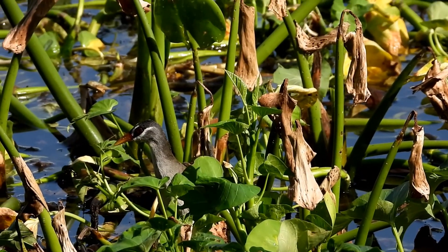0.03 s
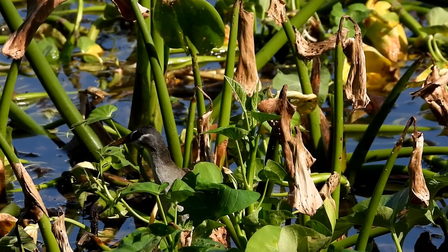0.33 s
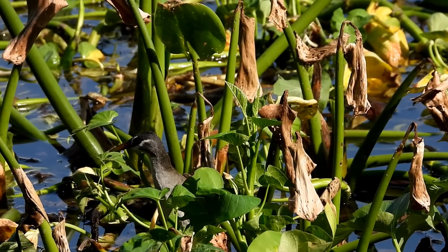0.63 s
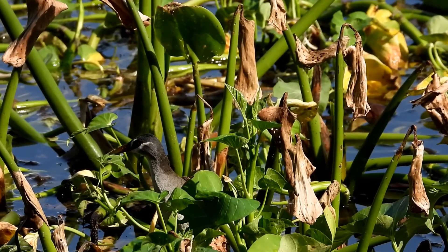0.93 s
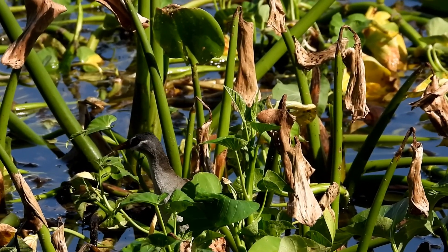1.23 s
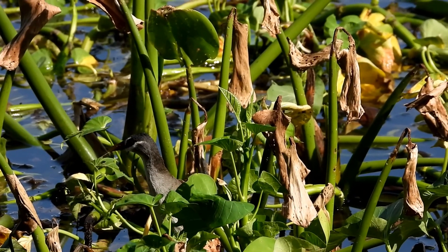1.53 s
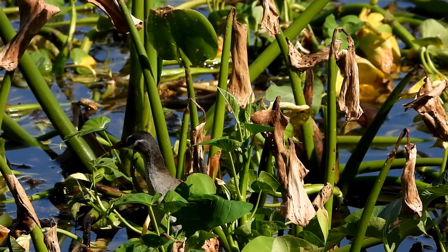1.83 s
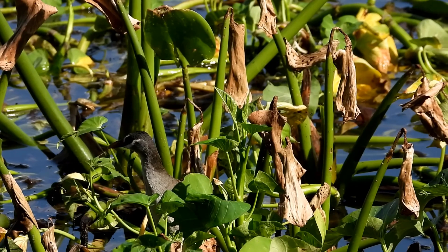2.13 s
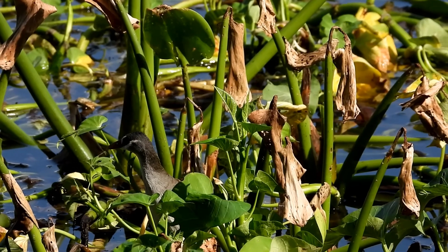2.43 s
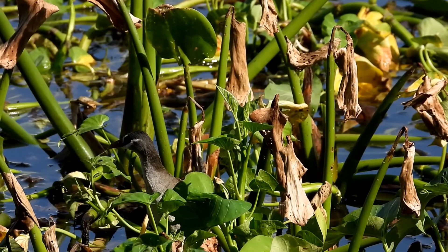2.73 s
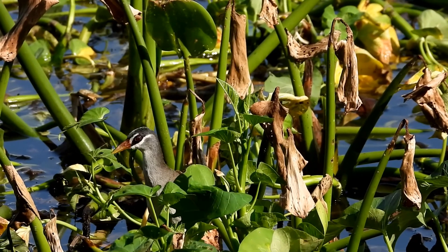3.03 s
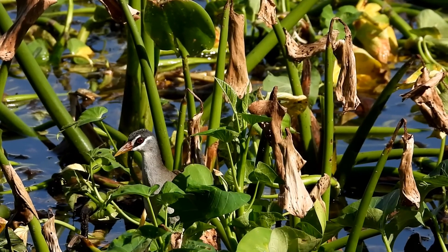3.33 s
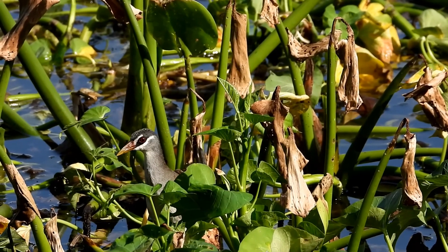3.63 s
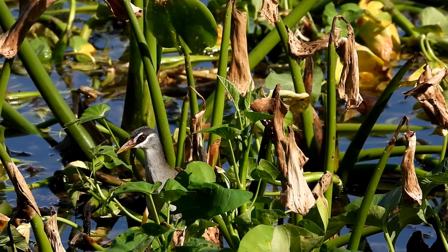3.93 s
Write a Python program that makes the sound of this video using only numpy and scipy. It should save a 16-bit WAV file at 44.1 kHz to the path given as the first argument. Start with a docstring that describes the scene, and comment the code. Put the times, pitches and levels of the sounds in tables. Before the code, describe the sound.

A rail calls close by in a marsh, at the start, at about 1.6 seconds and at 2.7 seconds. Each group is a sharp rising chip, a soft whine and a rough falling yelp. High insect buzz and a low rumble continue throughout. From 1.2 seconds a small bird twitters quietly in quick runs, and from 2.8 seconds a distant bird gives three very faint nasal mews.

```python
"""Insects buzz over soft air and a low rumble throughout. At once a rail calls from marsh plants close by:
a sharp rising chip, a soft dipping whine, a rough falling yelp. Stems scatter each note; the bank
returns a faint echo. Faint chatter follows, and a hollow rush peaks near 0.8 s. From 1.2 s a small
bird twitters. The rail calls again at 1.6 s and 2.7 s. From 2.8 s a far bird mews three times."""
import sys
import numpy as np
from scipy import signal
from scipy.fft import rfft, irfft
from scipy.io import wavfile
from scipy.ndimage import uniform_filter1d, minimum_filter1d

SR = 44100
rng = np.random.default_rng(int(sys.argv[2]) if len(sys.argv) > 2 else 0)


def waveform_to_disk(signal):
    """Save audio, clipped to [-1, 1], as 16-bit WAV at the path in sys.argv[1]."""
    frames = np.transpose(np.atleast_2d(signal))
    scaled = np.clip(frames, -1, 1) * 32767
    samples = np.round(scaled).astype(np.int16)
    wavfile.write(sys.argv[1], SR, samples)


N = 176400

# rail notes: start_s, length_s, pitch_ratio, level_db, bend (below 1 the contour runs early)
CHIPS = [(.0355, .029, 1.02, -18.5, 1.0), (1.5915, 0.028, 0.99, -16.5, 0.82),
         (2.7485, .028, 1.01, -15.5, 1)]
WHINES = [(.099, 0.12, 0.99, -30, 1.09), (1.658, 0.13, 0.98, -29.5, 1.03), (2.817, 0.11, .97, -28, 1)]
# rail yelps, far bird mews: start_s, length_s, pitch_ratio, level_db
YELPS = [(.3600, 0.037, 0.96, -19.5), (1.894, 0.039, 0.96, -19), (3.0440, .038, 0.98, -18.5)]
MEWS = [(2.83, 0.22, .99, -58.5), (3.31, .21, 1.016, -54), (3.745, .21, .945, -56)]
# small bird runs: start_s, length_s, level_db
TWITTERS = [(1.228, .34, -40), (1.776, .23, -38), (2.938, .29, -36.5), (3.358, .23, -39.5),
            (3.962, .06, -42.5)]
CHATTERS = [(.40, .23, -52), (2.10, .35, -51)]
# rail note contours: length_fraction, pitch_hz, level_db, overtones_db (beak opening)
CHIP_CONTOUR = [(0, 1120, -7.5, -1), (0.129, 1510, -3, 3), (0.299, 1698, -3, -5.5), (.48, 1829, -1, 1.5),
                (.68, 2003, -1, 6.5), (.86, 2248, -6.5, 9.5), (1, 2480, -5, -4)]
WHINE_CONTOUR = [(0, 1970, 2, 2), (0.039, 1750, 2, 1), (.14, 1618, 2, -2), (.48, 1582, -5.5, 1),
                 (.72, 1647, -4, -7), (.87, 1810, -6.5, -2), (1, 2010, -17, -6)]
YELP_CONTOUR = [(0, 1782, -5.5, 3.5), (0.149, 1666, -0.5, -1.5), (0.419, 1538, 1.5, 3.5),
                (0.621, 1368, -1, 0.5), (.8, 1288, -3, 2), (1, 1077, -9, -7)]
# other note contours: length_fraction, pitch_hz, level_db
SQUEAK_CONTOUR = [(0, 3150, 4), (.5, 3020, -9), (1, 2600, 8)]
SLUR_CONTOUR = [(0, 5100, -4), (.2, 4763, 4), (.42, 4655, -3.5), (.62, 4400, 5.5), (1, 4200, -27)]
CHATTER_CONTOUR = [(0, 5250, 8), (.4, 4950, -3.5), (1, 4450, -3)]
MEW_CONTOUR = [(0, 770, -7.5), (0.219, 693, -1), (.45, 644, -2), (.75, 643, 2), (1, 658, -2)]
# source harmonics, gaps interpolated: harmonic_number, level_db
CHIP_PARTIALS = [(1, 1), (2, -0.5), (3, -4), (4, -24.5), (5, -13), (7, -17)]
WHINE_PARTIALS = [(1, 0), (2, -7), (3, -29)]
YELP_PARTIALS = [(1, 2), (2, -3), (3, -8), (4, -15.5), (6, -17)]
MEW_PARTIALS = [(1, -29), (2, -5), (3, 0.5), (4, 5.5), (5, -6.5), (6, -12)]
# rail throat and beak response: frequency_hz, gain_db
THROAT = [(700, -7), (1200, -5), (1650, 0), (2200, -0.5), (2700, -4), (3300, 1.5), (3750, 13.5), (4300, 10),
          (4900, 3), (5800, -2), (8000, -6), (15000, -12)]
# noise spectra: frequency_hz, relative_density_db
INSECT_SPECTRUM = [(5400, -33), (5800, -17.5), (6050, -7), (6300, 0.5), (6550, -3.5), (6900, -4.5),
                   (7500, -11.5), (8100, -10), (8850, -9.5), (9250, -16), (9600, -46), (11000, -33)]
AIR_SPECTRUM = [(100, 3), (200, 2.5), (550, 0.5), (1000, -7.5), (2000, -10.5), (4200, -15), (5400, -60.5),
                (9800, -9), (11000, -21.5), (13000, -21), (15800, -21.5)]
RUSH_SPECTRUM = [(300, -22), (520, -1), (660, 1), (800, -8.5), (1100, -7), (3000, -60)]
RUMBLE_SPECTRUM = [(10, -6), (26, -2), (42, -1.5), (55, 3.5), (68, -8.5), (90, -17), (125, -23),
                   (180, -36.5), (400, -68)]


def rail(squeak_s=.009, squeak_db=-30):
    """Strained chip, clear whine and strained yelp from one throat; a thin squeak leads into each yelp."""
    chips = syrinx(CHIPS, CHIP_CONTOUR, CHIP_PARTIALS, jitter=.011, shimmer=.076, sub_db=-16, rasp_db=-7)
    whines = syrinx(WHINES, WHINE_CONTOUR, WHINE_PARTIALS, jitter=.007, shimmer=.1, rasp_db=-21)
    yelps = syrinx(YELPS, YELP_CONTOUR, YELP_PARTIALS, jitter=.012, shimmer=.15, sub_db=-9, rasp_db=-14)
    lead_ins = [(start_s - squeak_s, squeak_s, 1, squeak_db) for start_s, *_ in YELPS]
    squeaks = syrinx(lead_ins, SQUEAK_CONTOUR, [(1, 0)], jitter=.029, shimmer=.05)
    calls = throat(chips + whines + yelps) + squeaks
    return pan(marsh(calls, wet_db=0), left_db=1.1, lead_us=26.3)


def syrinx(notes, contour, partials, jitter, shimmer, waver=.0057, sub_db=-80, rasp_db=-60):
    """The syrinx glides through each note; strain doubles the period and adds rasp."""
    attack_s, release_s = .00061, .00097
    out = np.zeros(N)
    fraction, pitch_hz, contour_db, *beak_db = np.array(contour).T
    harmonics, partial_db = np.array(partials).T
    for start_s, length_s, pitch_ratio, level_db, *bend in notes:
        t = np.arange(int(length_s * SR)) / SR
        progress = (t / length_s) ** (bend[0] if bend else 1)
        along = lambda values: np.interp(progress, fraction, values)
        wobble = lambda rate_hz: drift(rate_hz, SR // 2)[:len(t)]
        hz = pitch_ratio * along(pitch_hz) * (1 + jitter * wobble(1500) + waver * wobble(90))
        phase = 2 * np.pi * np.cumsum(hz) / SR
        overtones = undb(rasp_db) * rng.standard_normal(SR // 2)[:len(t)] * (1 + np.cos(phase))  # rasp
        for k in range(2, round(harmonics[-1]) + 1):
            half_order = undb(sub_db) * np.sin((k + .5) * phase + .5 * wobble(490))
            overtones += undb(np.interp(k, harmonics, partial_db)) * (np.sin(k * phase) + half_order)
        beak_gain = undb(along(beak_db[0])) if beak_db else 1
        tone = undb(partial_db[0]) * np.sin(phase) + beak_gain * overtones
        gate = np.clip(np.minimum(t / attack_s, (length_s - t) / release_s), 0, 1)
        envelope = gate * undb(level_db + along(contour_db)) * (1 + shimmer * wobble(900))
        add(out, start_s, tone * envelope)
    return out


def throat(x):
    """Throat and beak resonances colour the voice."""
    hz = np.arange(N + 1) * SR / (2 * N)
    return irfft(rfft(x, 2 * N) * gain_at(hz, THROAT))[:N]


def small_bird():
    """Quick runs of thin falling slurs; fainter raspy chatter between them."""
    slurs = syrinx(runs(TWITTERS), SLUR_CONTOUR, [(1, -3.5)], jitter=.022, shimmer=.19, waver=.0131)
    chatter = syrinx(runs(CHATTERS), CHATTER_CONTOUR, [(1, 3)], jitter=.05, shimmer=.22)
    return pan(marsh(slurs + chatter, wet_db=9), left_db=.5, lead_us=18)


def runs(table, note_s=.048, period_s=.058, pitch_spread=.007, spread_db=1.2):
    """Evenly spaced notes, scattered in pitch and level."""
    notes = []
    for start_s, length_s, level_db in table:
        for k in range(round(length_s / period_s)):
            pitch_ratio = rng.normal(1, pitch_spread)
            notes.append((start_s + k * period_s, note_s, pitch_ratio, rng.normal(level_db, spread_db)))
    return notes


def far_bird():
    """Faint nasal mews that waver and fade in and out with distance."""
    mews = syrinx(MEWS, MEW_CONTOUR, MEW_PARTIALS, jitter=.013, shimmer=.22, waver=.0111)
    fading_db = 1.5 + 2.2 * drift(35)
    return pan(marsh(mews * undb(fading_db), wet_db=3.5), left_db=.8)


def marsh(x, wet_db, stems_t60_s=.13, tail_t60_s=.65, bank_s=.089):
    """Quick scatter from the stems, a faint long tail, one echo from the bank."""
    stems_db, tail_db, bank_db = -9.5, -28.5, -28.5  # relative to wet_db
    t = np.arange(SR // 2) / SR
    stems = undb(-60 * t / stems_t60_s) * (1 - np.exp(-t / .001))
    tail = undb(-60 * t / tail_t60_s)
    stems *= undb(stems_db) / np.linalg.norm(stems)
    tail *= undb(tail_db) / np.linalg.norm(tail)
    scatter = (rng.standard_normal(len(t)) + rng.standard_normal((2, len(t)))) / np.sqrt(2)
    response = np.hypot(stems, tail) * scatter
    response[:, int(bank_s * SR)] += undb(bank_db)
    return x + undb(wet_db) * signal.fftconvolve(x[None], response, axes=1)[:, :N]


def insects(level_db=-32.5, pulse_hz=26.4, pulse_depth=.042):
    """Many scraping insects merge into a fluttering buzz with a weak common pulse."""
    t = np.arange(N) / SR
    pulse = 1 + pulse_depth * np.sin(2 * np.pi * pulse_hz * t + .75 * drift(3.94))
    buzz = stereo_noise(INSECT_SPECTRUM, side_db=-9) * pulse
    flutter_db = .5 * drift(2.75) + .68 * drift(250)
    return pan(buzz * undb(level_db + flutter_db), left_db=1.5, lead_us=27.4)


def background(air_db=-46.5, rush_db=-50, rumble_db=-23.5, rush_peak_s=.79, rush_width_s=.79):
    """Soft open air and a hollow rush that swells and fades, over a deep, uneven rumble."""
    t = np.arange(N) / SR
    air = stereo_noise(AIR_SPECTRUM, side_db=-8) * undb(air_db + .98 * drift(2))
    swell = np.exp(-((t - rush_peak_s) / rush_width_s) ** 2)
    rush = stereo_noise(RUSH_SPECTRUM, side_db=-18) * undb(rush_db) * swell
    rumble = stereo_noise(RUMBLE_SPECTRUM, side_db=-18) * undb(rumble_db + drift(7.05))
    return pan(air + rush, left_db=1.2) + pan(rumble, left_db=3)


def stereo_noise(spectrum, side_db):
    """Shaped noise: unit-RMS mid plus a weaker side."""
    hz = np.arange(N // 2 + 1) * SR / N
    mid, side = irfft(rfft(rng.standard_normal((2, N))) * gain_at(hz, spectrum), N)
    return mid / mid.std() + undb(side_db) * side / side.std() * np.array([[1], [-1]])


def pan(x, left_db, lead_us=0):
    """Sound from the left is louder and earlier on that side."""
    side = np.array([[.5], [-.5]])
    hz = np.arange(N // 2 + 1) * SR / N
    time_shift = np.exp(2j * np.pi * hz * side * lead_us * 1e-6)
    return irfft(rfft(x) * time_shift, N) * undb(side * left_db)


def drift(rate_hz, size=N):
    """Smooth random curve, spread about 1."""
    hold = max(int(SR / rate_hz), 1)
    steps = np.repeat(rng.standard_normal(size // hold + 1), hold)
    return 1.3 * uniform_filter1d(steps, hold)[:size]


def gain_at(hz, spectrum):
    """Linear gain, interpolated in dB over log frequency."""
    points_hz, points_db = np.array(spectrum).T
    return undb(np.interp(np.log(np.maximum(hz, 1)), np.log(points_hz), points_db))


def undb(db):
    """Decibels to gain."""
    return 10 ** (np.asarray(db) / 20)


def add(out, start_s, x):
    """Mix x in at start_s."""
    i = max(int(start_s * SR), 0)
    x = x[:max(N - i, 0)]
    out[i:i + len(x)] += x


def scene():
    """The rail in front of the wetland."""
    return rail() + small_bird() + far_bird() + insects() + background()


def record(dry, ceiling=.93, limiter_s=.0033, cubic_share=.035, lowpass_hz=15800):
    """Fast peak limiter, slight cubic distortion, steep low-pass."""
    window = int(limiter_s * SR)
    gain = np.minimum(1, ceiling / (np.abs(dry).max(axis=0) + 1e-9))
    limited = dry * uniform_filter1d(minimum_filter1d(gain, window), window)
    distorted = limited - cubic_share * limited ** 3
    return signal.sosfilt(signal.ellip(10, .2, 80, lowpass_hz, fs=SR, output="sos"), distorted)


dry = scene()
out = record(dry)
waveform_to_disk(out)
```